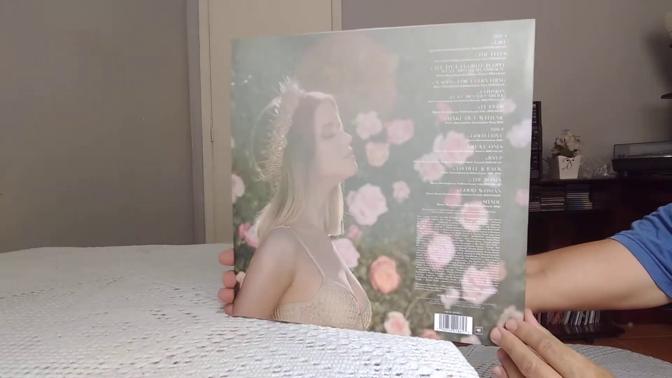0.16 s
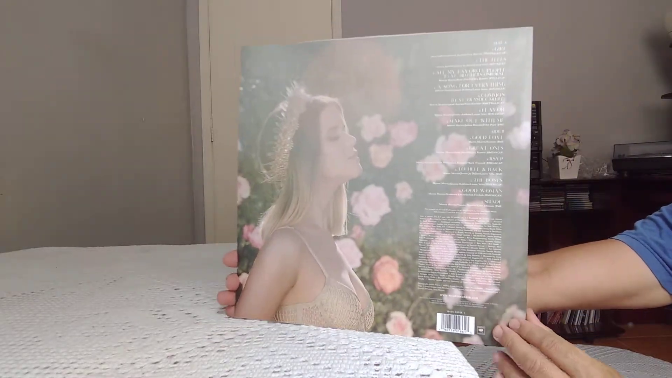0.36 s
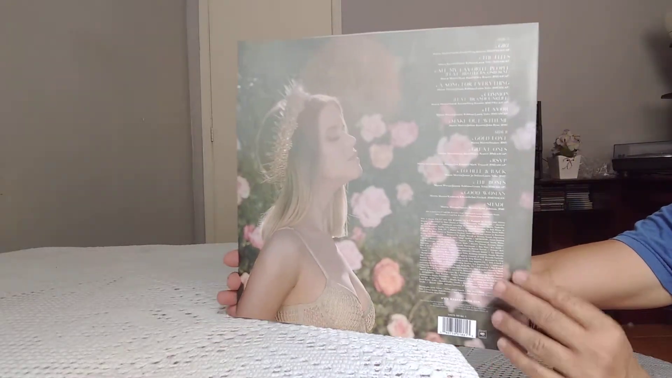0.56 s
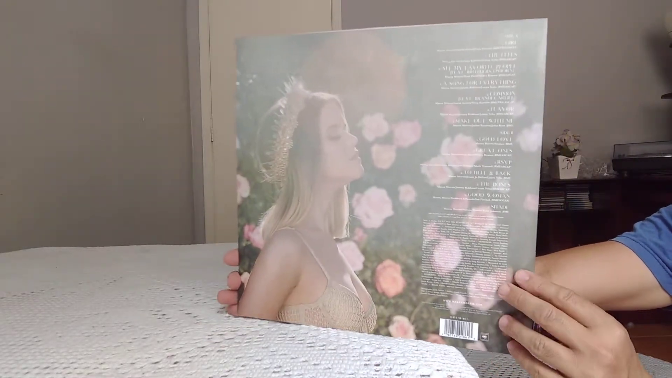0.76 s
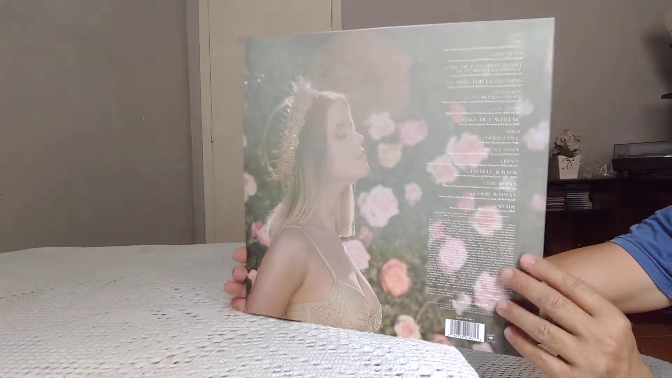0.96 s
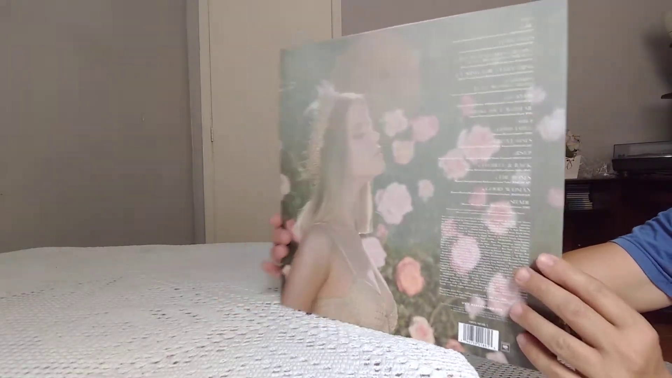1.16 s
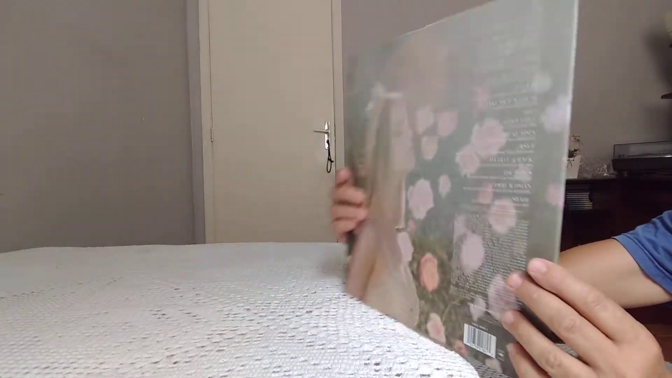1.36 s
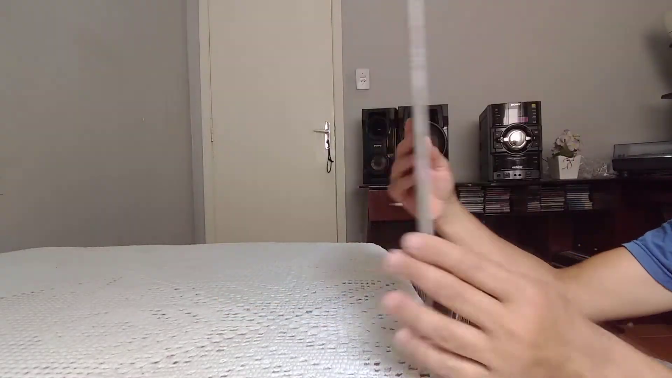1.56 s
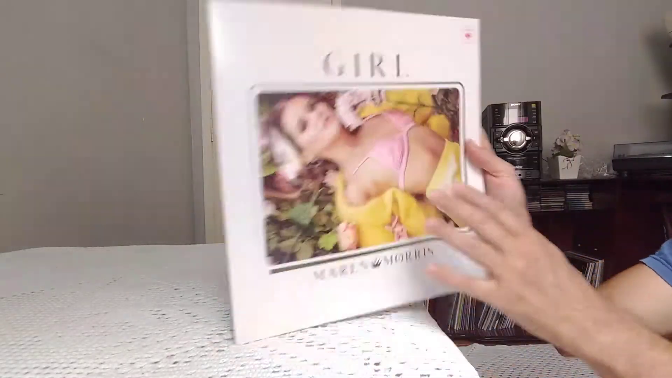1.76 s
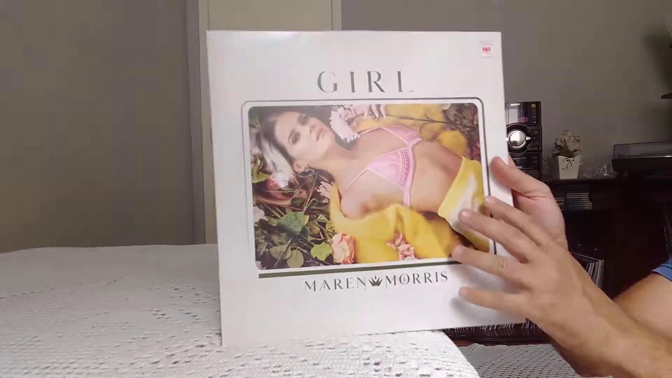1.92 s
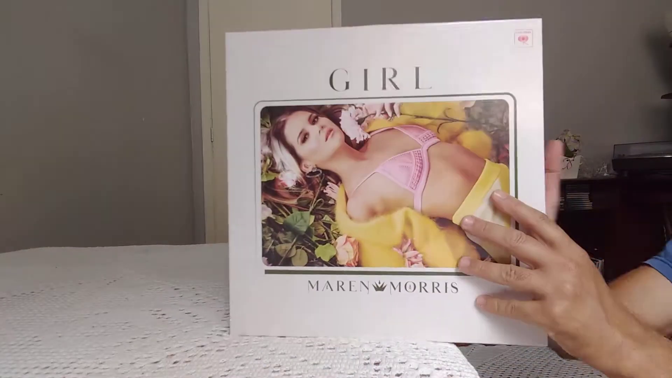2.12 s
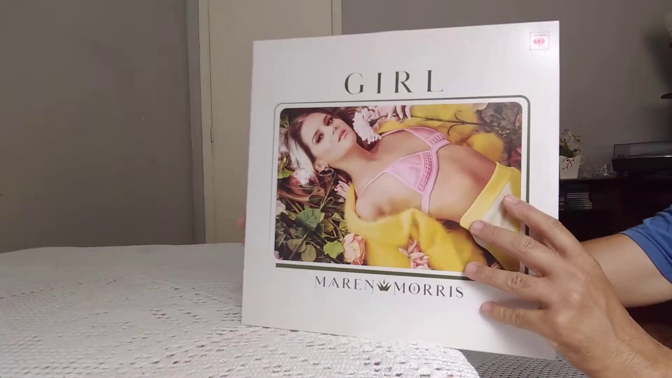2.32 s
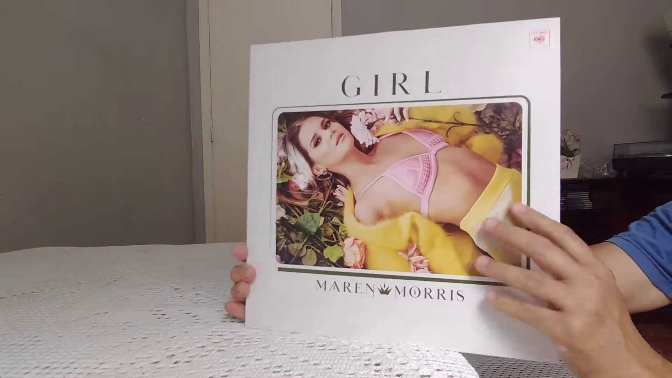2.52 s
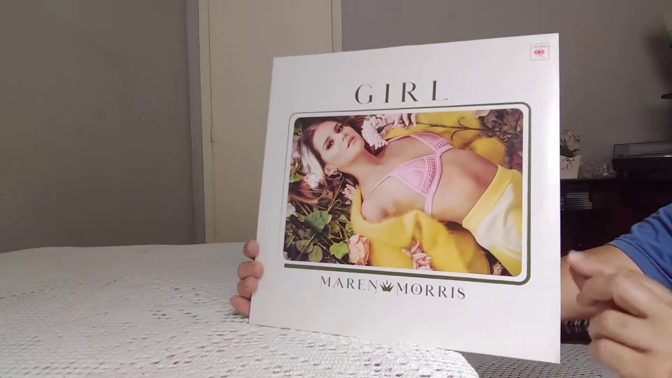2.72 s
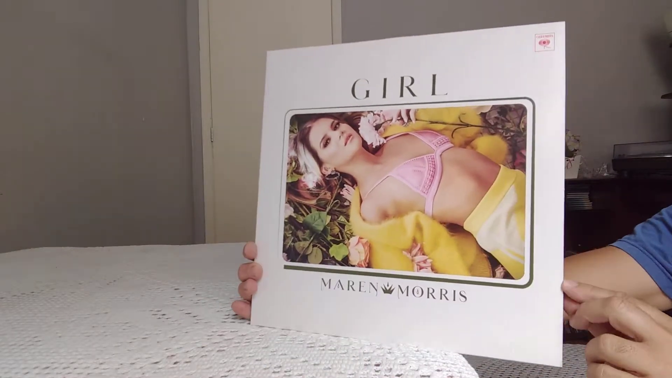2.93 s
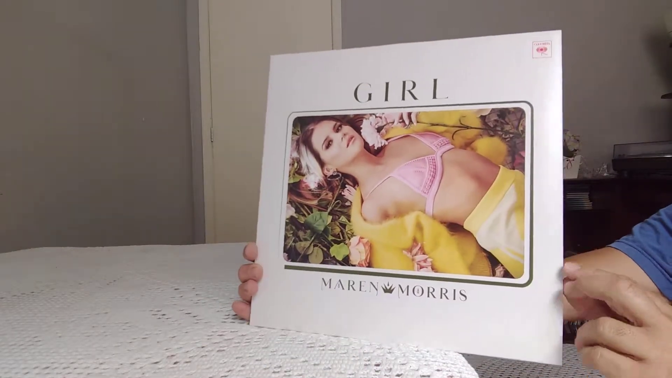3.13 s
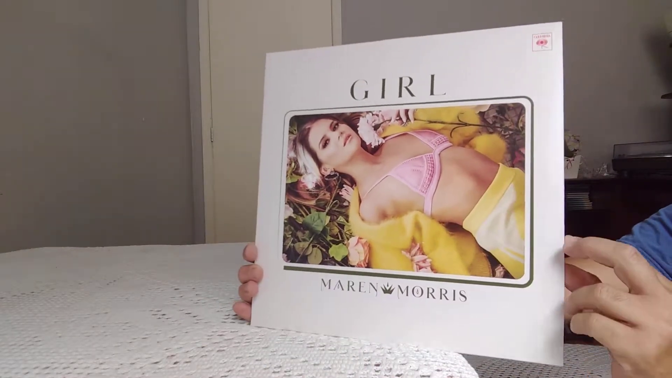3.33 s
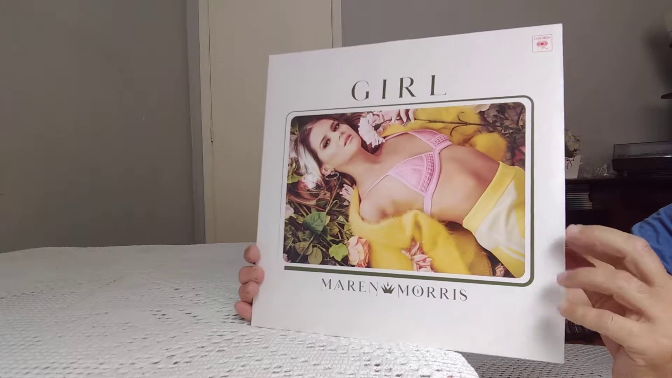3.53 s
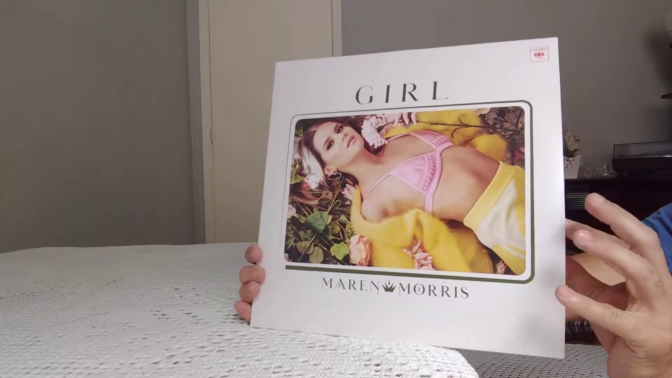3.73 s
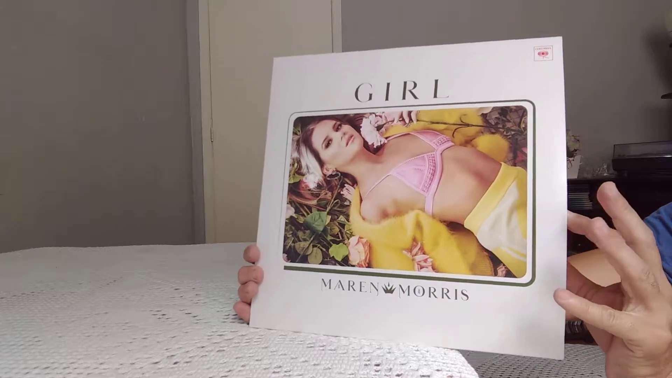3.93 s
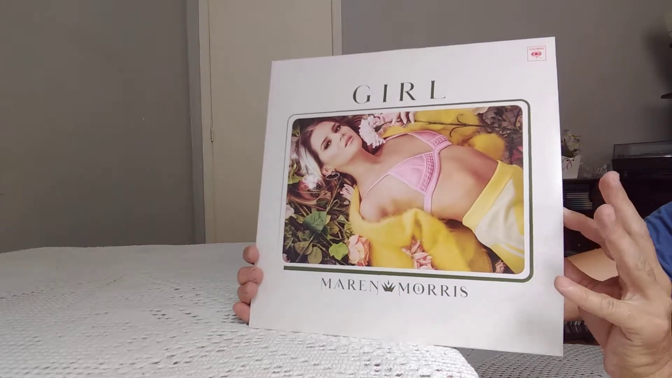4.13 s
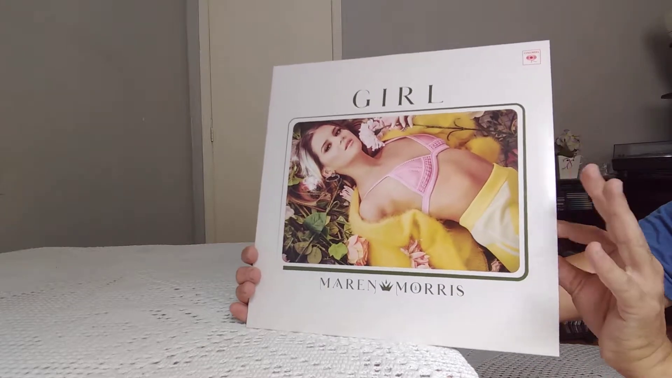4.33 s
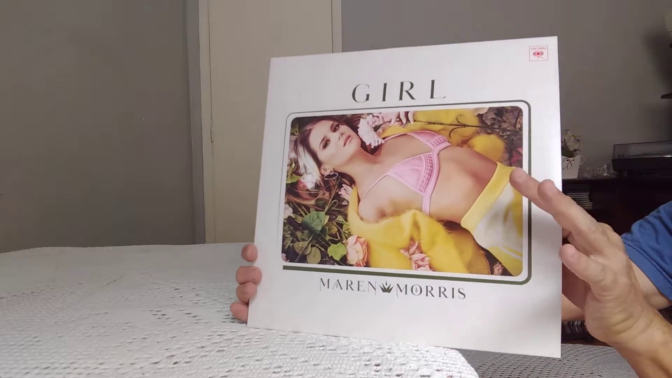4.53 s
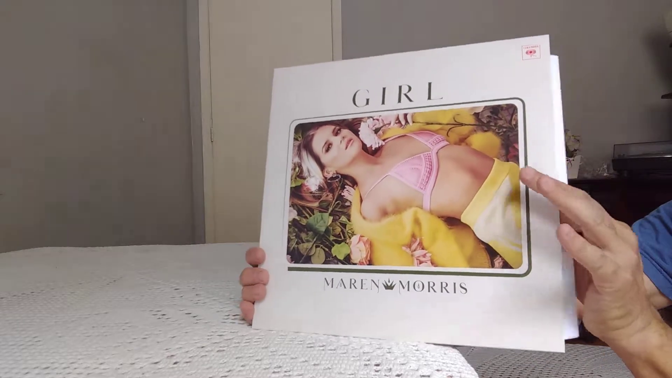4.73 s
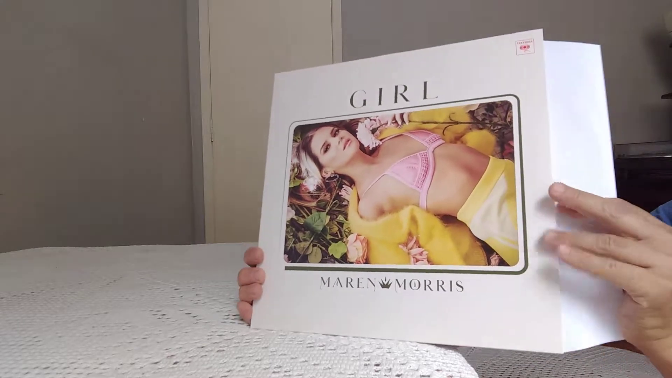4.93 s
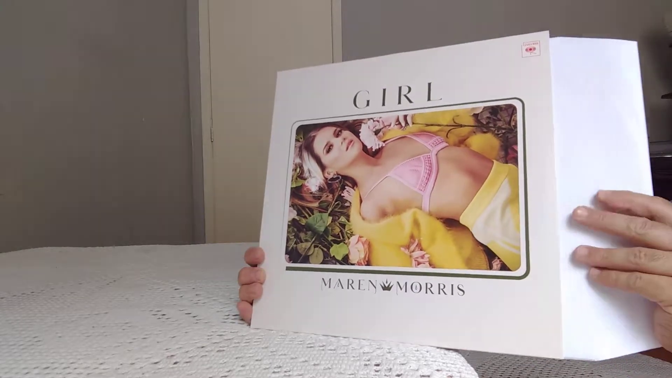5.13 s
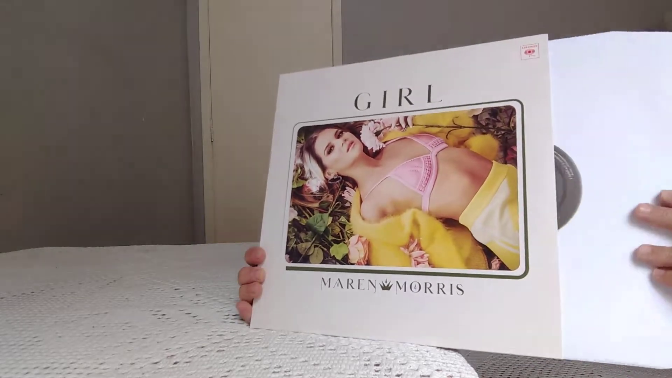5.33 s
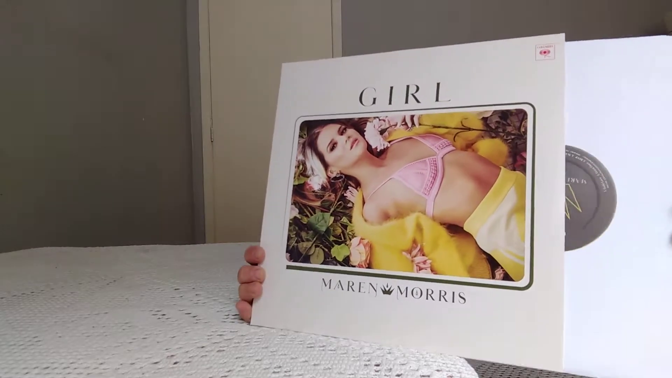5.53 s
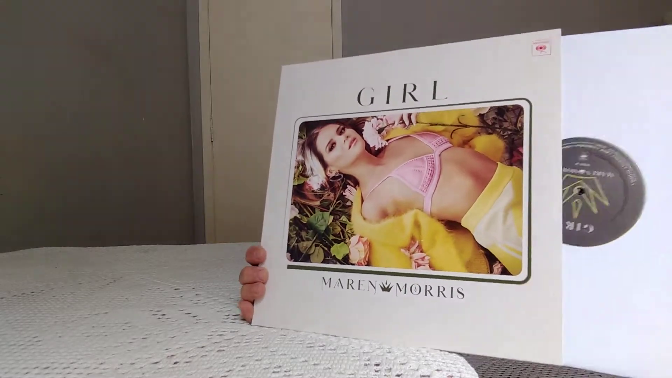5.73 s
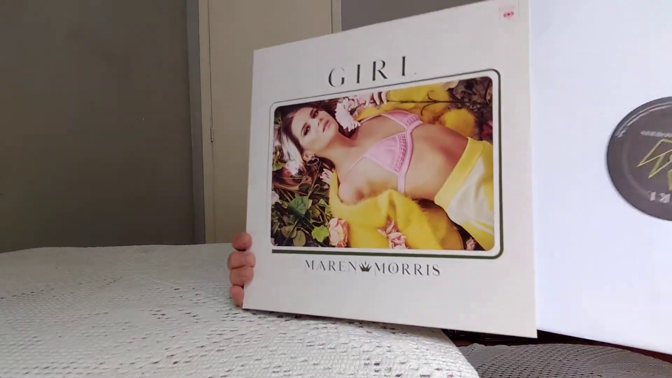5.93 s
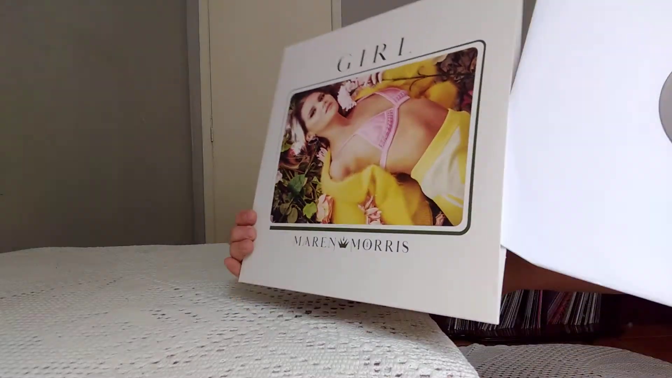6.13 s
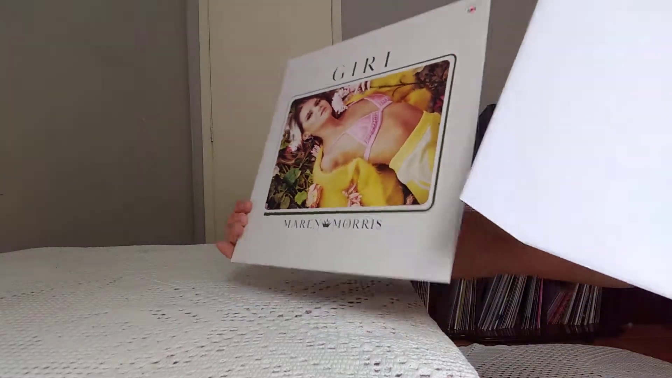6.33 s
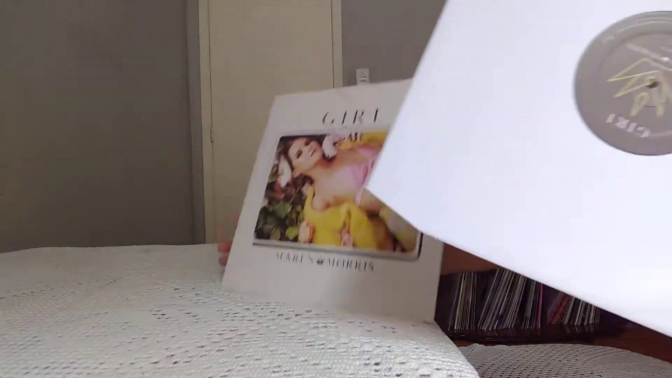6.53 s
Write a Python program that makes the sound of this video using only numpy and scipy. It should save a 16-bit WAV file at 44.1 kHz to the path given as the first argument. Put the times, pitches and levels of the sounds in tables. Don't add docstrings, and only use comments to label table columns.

```python
import sys
import numpy as np
from scipy import signal
from scipy.fft import rfft, irfft, next_fast_len
from scipy.io import wavfile
from scipy.ndimage import uniform_filter1d

SR = 44100
rng = np.random.default_rng(int(sys.argv[2]) if len(sys.argv) > 2 else 0)


def master_out(mix):
    frames = np.transpose(np.atleast_2d(mix))
    ceiling = np.clip(frames, -1, 1)
    pcm = np.round(ceiling * 32767).astype(np.int16)
    wavfile.write(sys.argv[1], SR, pcm)


def boost(x):
    u = np.asarray(x, float) / 20
    return 10 ** u


N = 294049

PORT_DELAY_S, PORT_TURN_RAD = 0.000391, 0.26
REST_HISS_DB = -94


def evened(x):
    return x / np.sqrt(np.mean(x ** 2) + 1e-20)


def peaked(x):
    return x / abs(x).max()


def read(points, hz):
    f, value = np.transpose(points)
    return np.interp(np.log(hz + 1), np.log(f + 1), value)


def glide(s, values):
    return np.interp(np.arange(N) / SR, s, values)


def add(mix, s, sound):
    part = mix[round(s * SR):][:len(sound)]
    part += sound[:len(part)]


def shaped(x, gain):
    size = next_fast_len(N)
    return irfft(rfft(x, size) * gain(np.fft.rfftfreq(size, 1 / SR)), size)[..., :N]


def port_lag(hz):
    return np.exp(-1j * (2 * np.pi * hz * PORT_DELAY_S + PORT_TURN_RAD))


def resonate(x, hz, width):
    turn = np.exp(2j * np.pi * np.cumsum(hz * np.ones(len(x))) / SR)
    r = np.exp(-np.pi * width / SR)
    return 2 * (turn * signal.lfilter([1 - r], [1, -r], x * turn.conj() + 1e-18)).real


def resonate_twice(x, hz, width):
    return resonate(resonate(x, hz, width), hz, width)


def ring(modes):
    t = np.arange(SR // 5) / SR
    return sum(boost(db - 60 * t / t60) * np.sin(2 * np.pi * hz * t) for hz, db, t60 in modes)


def slips(per_s, spread_db, clump_db, clump_s):
    size = boost(spread_db * np.minimum(rng.exponential(1, N), 4)) * (rng.random(N) < per_s / SR)
    clumps = evened(uniform_filter1d(rng.standard_normal(N), max(round(clump_s * SR), 1)))
    return evened(size * rng.standard_normal(N) * boost(clump_db * clumps))


def strokes(s, rise, fall, db, rest_db):
    t = np.arange(0, N + 128, 128)[:, None] / SR
    u = np.where(t < s, (s - t) / rise, (t - s) / fall)
    stroke_db = db - 13 * u ** 1.29
    power = (boost(stroke_db) ** 2).sum(1) + boost(rest_db) ** 2
    return glide(t[:, 0], 10 * np.log10(power))


def air():
    # hz, density_db (per Hz)
    air_tone = [(35, -47), (48, 7.5), (80, -7.5), (130, -2), (220, -7), (400, -10), (800, -14), (1400, -18),
                (2200, -17), (3500, -19), (6000, -22.5), (9000, -29), (14000, -35.5)]
    # hz, likeness (0-1)
    likeness = [(60, 0), (300, 0.52), (600, 0.18), (1200, 0), (2500, 0.16), (4000, 0)]
    # pitch_hz, width_hz, level_db, far_share (signed)
    whines = [
        (54.6, 8.3, -66, 0.32),
        (180.9, 5.3, -70.5, 0.8),
        (1205, 25, -82, 0.86),
        (1840, 35, -70.5, -0.45),
        (142, 6, -74.5, 0.62),
    ]
    count, hz = N // 512 + 5, np.fft.rfftfreq(2048, 1 / SR)
    a, b, c, d, patches = rng.standard_normal((count, 1025, 5)).T
    patches = evened(uniform_filter1d(uniform_filter1d(patches, 16, 0), 8, 1))
    same = read(likeness, hz)[:, None]
    near = a + 1j * b
    far = same * near + np.sqrt(1 - same ** 2) * (c + 1j * d)
    z = np.array([far, near]) * boost(read(air_tone, hz)[:, None] + 1.8 * patches)
    out = boost(-63) * evened(signal.istft(z, nperseg=2048, noverlap=1536)[1][:, :N])
    for pitch_hz, width, db, far_share in whines:
        whine = evened(resonate(rng.standard_normal(N), pitch_hz, width))
        out = out + boost(db) * whine * np.array([[far_share], [1]])
    return out


def table_drone():
    # time_s, pitch_hz, level_db
    load = [(0.0, 56.0, -76), (0.18, 53.4, -65.5), (0.35, 57.56, -74), (1.04, 59.9, -77.5),
            (2.4, 59.9, -72), (2.51, 54.6, -72), (2.69, 54.6, -80), (2.9, 58.8, -71), (4.31, 57.9, -76.5),
            (4.38, 54.4, -86), (4.66, 58.9, -67.5), (4.96, 51.96, -66), (5.22, 51.6, -74),
            (5.4, 59.4, -79.5), (5.7, 60.8, -73), (5.9, 52.6, -66), (6.39, 53.2, -67), (6.67, 49.1, -60)]
    s, *columns = np.transpose(load)
    hz, db = (glide(s, c) for c in columns)
    wander = rng.standard_normal((2, 2, N))
    waver, drift = evened(uniform_filter1d(uniform_filter1d(wander, 1200), 1200))
    phase = 2 * np.pi * np.cumsum(hz) / SR + 0.4 * drift
    return boost(db + 11 + 3.5 * waver) * np.sin(phase) * np.array([[0.51], [1]])


def birds():
    # start_s, length_s, start_hz, end_hz, level_db
    calls = [(0.027, 0.08, 2740, 2760, -65.5), (0.09, 0.1, 5820, 6000, -67.5),
             (0.09, 0.08, 5500, 5700, -71), (0.422, 0.14, 3290, 3250, -69), (0.504, 0.18, 2320, 2530, -67),
             (0.783, .16, 6120, 6000, -74), (0.906, 0.099, 5020, 5040, -69),
             (1.507, 0.066, 6100, 6300, -54), (1.575, .05, 6150, 6100, -61), (1.64, 0.16, 6000, 5840, -72),
             (2.399, .14, 6150, 6320, -68), (2.812, 0.14, 4500, 4040, -71), (2.907, 0.17, 5670, 5860, -71),
             (3.197, 0.2, 6000, 5900, -68.5), (3.744, 0.09, 4730, 4700, -69), (6.21, .08, 7650, 7600, -60),
             (6.237, 0.14, 6880, 6620, -55.5), (6.309, 0.32, 1950, 1900, -74)]
    out = np.zeros((2, N))
    for s, length, from_hz, to_hz, db in calls:
        size = round(length * SR)
        hz, u = np.linspace(from_hz, to_hz, size), np.linspace(0, 1, size)
        swell = np.minimum(u / 0.052, 1) * (1 - u) ** 0.38
        for port in out:
            note = resonate_twice(rng.standard_normal(size), hz, 190)
            add(port, s, boost(db) * evened(note) * swell)
    return out


def surface_hiss(fine):
    # hz, density_db (per Hz)
    hiss_tone = [(1500, -17), (3000, 3), (5000, 6), (7500, 5.5), (10000, 5), (12500, 4.5), (14500, -3.5)]
    return evened(shaped(fine, lambda hz: boost(read(hiss_tone, hz))))


def rasp(coarse, rasp_hz):
    wide = resonate_twice(coarse, 2650, 3200)
    return evened(evened(wide) + 0.7 * evened(resonate(coarse, rasp_hz, 1300)))


def panel_modes(push, modes):
    return evened(sum(boost(db) * resonate_twice(push, hz, 2 * w) / np.sqrt(w) for hz, w, db in modes))


def board(coarse, fine, slot_hz):
    # pitch_hz, width_hz, level_db
    board_modes = [(540, 200, -8.5), (916, 210, -7.5), (1900, 1230, 7.5)]
    slot = evened(resonate(fine, slot_hz, 190))
    return evened(panel_modes(coarse, board_modes) + 0.78 * slot)


def flexing():
    # pitch_hz, width_hz, level_db
    flex_modes = [(143, 83, 3.5), (228, 65, -4), (377, 110, -6)]
    # peak_s, rise_and_fall_s, level_db
    bends = [(.15, 0.17, -61.5), (.45, 0.23, -65.5), (.81, 0.086, -68), (1.2, 0.11, -60.5),
             (1.39, 0.19, -56.5), (1.62, 0.22, -62.5), (1.84, 0.15, -55), (2.03, 0.096, -61.5),
             (2.15, 0.087, -59.5), (2.42, 0.091, -61), (2.6, 0.12, -59), (2.8, 0.16, -60),
             (3.13, 0.08, -74), (3.37, 0.17, -63.5), (3.53, 0.072, -59), (3.79, 0.057, -58.5),
             (4.03, 0.072, -67), (4.5, 0.067, -57), (4.62, 0.088, -61.5), (4.9, 0.62, -60.5),
             (5.25, 0.023, -53.5), (5.7, 0.089, -57.5), (6.0, 0.21, -58.5), (6.14, 0.16, -50.5),
             (6.23, 0.03, -51), (6.31, 0.12, -52.5), (6.61, 0.049, -42)]
    s, length, bend_db = np.transpose(bends)
    flex_db = strokes(s, length, length, bend_db, -74.5)
    return boost(flex_db + 0.5) * panel_modes(slips(900, 1.1, 1.5, 0.037), flex_modes)


def rubbing():
    # peak_s, rise_s, fall_s, speed_db, panel_weight_db
    turning = [(.06, 0.17, 0.13, -76, 13.5), (.19, 0.22, 0.091, -80, 18.5), (.40, 0.048, 0.056, -79.5, 14),
               (.64, 0.2, 0.074, -80.5, 11), (.77, .03, 0.027, -78, -2), (.98, 0.089, .2, -73, -15),
               (1.13, 0.061, 0.087, -62.5, -5), (1.22, 0.061, 0.11, -66, -13), (1.26, .04, .04, -64, -10),
               (1.296, 0.014, 0.06, -58, -14), (1.335, 0.008, 0.02, -58, 3), (1.35, 0.032, 0.065, -52, 4),
               (1.395, .02, .03, -56, -5), (1.44, 0.042, 0.19, -54.5, -1), (1.435, 0.016, .012, -60, 17),
               (1.46, .01, 0.04, -55, -5), (1.53, .08, .08, -72, -17), (1.615, 0.052, 0.053, -56, -12),
               (1.8, 0.65, 0.41, -67, 4), (2.06, 0.16, 0.065, -63, -12), (2.2, 0.13, 0.041, -70, -4),
               (2.47, 0.16, 0.17, -70.5, 6), (2.52, .03, .06, -64, -3), (2.61, 0.091, 0.055, -59.5, 1),
               (2.652, 0.077, 0.019, -59.5, 1), (2.71, .03, 0.072, -76, 4), (2.87, 0.31, 0.25, -79, 11),
               (3.04, 0.051, 0.037, -84, 1), (3.127, 0.0069, 0.0042, -54, 4),
               (3.23, 0.096, 0.13, -78.5, 14), (3.53, 0.17, 0.19, -73.5, 14.5), (3.6, 0.031, 0.03, -72, 5),
               (3.8, .025, 0.034, -76, 21), (3.77, 0.12, 0.085, -72, 10), (3.95, 0.063, 0.037, -72.5, 15.5),
               (4.03, 0.016, 0.018, -80.5, 20)]
    # peak_s, rise_s, fall_s, speed_db, panel_weight_db
    drawing = [(4.268, 0.0049, 0.021, -67, 16.5), (4.25, 0.11, 0.16, -77, 13),
               (4.381, 0.013, 0.063, -66.5, 6.5), (4.47, 0.059, 0.069, -58, 5.5),
               (4.51, 0.054, 0.11, -61.5, 13), (4.685, 0.047, 0.18, -60, 10), (4.79, 0.1, 0.64, -54, -2),
               (4.85, .04, 0.065, -53.5, 6), (4.96, 0.043, 0.046, -61, 7), (5.09, 0.072, 0.046, -58, 8.5),
               (5.04, 0.37, 0.29, -60.5, -3), (5.19, 0.056, 0.18, -56.5, 4), (5.25, 0.023, 0.12, -52, -21),
               (5.39, 0.17, 0.12, -58.5, -1.5), (5.475, 0.08, 0.02, -59.5, 1.5),
               (5.53, 0.05, 0.12, -65.5, 0.5), (5.64, 0.25, 0.03, -68, -9), (5.717, 0.012, 0.01, -48, -10),
               (5.735, .015, .04, -53, -3), (5.765, 0.033, 0.13, -50, -5), (5.79, 0.06, 0.12, -53, -0.5),
               (5.87, 0.11, 0.22, -47, -9), (5.91, .025, 0.03, -50, -4), (5.99, 0.055, 0.046, -50, 0),
               (6.09, 0.038, .02, -49, 2), (6.02, 0.087, 0.16, -57, -11), (6.144, 0.17, 0.032, -43, -1.5),
               (6.23, 0.064, 0.031, -51.5, -10), (6.274, 0.0039, 0.038, -46, -15.5),
               (6.297, 0.02, 0.011, -52, 4.5), (6.34, .03, 0.11, -67.5, 5), (6.44, 0.11, 0.11, -80.5, 16.5),
               (6.554, 0.072, 0.025, -64, -2), (6.592, .006, 0.053, -66.5, 14),
               (6.635, 0.03, 0.18, -71.5, 20)]
    # time_s, grit_db, rasp_hz, slot_hz
    contact = [(0, -3, 4000, 1320), (.2, 7, 4330, 1060), (.6, -22, 3600, 1270), (1.1, 4, 4180, 1490),
               (1.45, 2.5, 4440, 1250), (1.6, -17, 5600, 1290), (1.8, 4.5, 3770, 1320),
               (2.4, 4, 3860, 1450), (2.66, -5, 4170, 1540), (3, 9, 4300, 1400), (3.8, 2, 4100, 1040),
               (4.15, -4.5, 3740, 1070), (4.55, 2.5, 4060, 1100), (5.22, 3.5, 4300, 1540),
               (5.45, -8.5, 4600, 1370), (5.72, -1.5, 4600, 1250), (5.97, -9, 4600, 1530),
               (6.13, 1.5, 3820, 1240)]
    s, rise, fall, speed_db, weight_db = np.transpose(turning + drawing)
    hiss_db = strokes(s, rise, fall, speed_db, REST_HISS_DB)
    board_db = strokes(s, rise, fall, speed_db + weight_db, -74)
    film_db = strokes(*np.transpose(turning)[:4], REST_HISS_DB) - 2
    s, *columns = np.transpose(contact)
    grit_db, rasp_hz, slot_hz = (glide(s, c) for c in columns)
    rasp_db = -64 + 0.63 * (hiss_db + 61) + grit_db
    fine = slips(20000, 1.1, 0.6, 0.0091)
    coarse = slips(7000, 1.44, 1.53, 0.009)
    hiss = surface_hiss(fine)
    sheen = shaped(hiss, lambda hz: 1 / (1 + (11100 / (hz + 1)) ** 4))
    out = boost(hiss_db + 6.5) * hiss + boost(film_db) * sheen
    out += boost(rasp_db + 4) * rasp(coarse, rasp_hz)
    out += boost(board_db - 4) * board(coarse, fine, slot_hz)
    return out + flexing()


def clicks():
    # start_s, peak_db, ring_hz, t60_s
    releases = [(0.644, -47, 1730, 0.0079), (0.994, -52, 794, 0.0055), (1.346, -40, 1450, 0.005),
                (1.374, -41, 1460, 0.0055), (1.393, -41, 864, 0.0055), (1.43, -42, 3400, 0.005),
                (1.435, -35, 1850, 0.0055), (1.439, -37, 2000, 0.0034), (1.458, -44, 1350, 0.0055),
                (1.626, -42, 1700, 0.0055), (2.3554, -44, 3080, 0.003), (2.3695, -42, 3000, 0.0033),
                (2.4227, -32, 1750, 0.0035), (2.4256, -37, 1710, 0.004), (2.44, -49, 1910, 0.0055),
                (2.607, -38, 1490, 0.0036), (2.741, -55, 1184, 0.0055), (2.9575, -43, 1720, 0.0065),
                (2.9695, -50, 1220, 0.0055), (3.5, -39, 1260, 0.0037), (3.522, -42, 1090, 0.0055),
                (3.548, -44, 1200, 0.0051), (3.778, -45, 888, 0.0065), (3.792, -41, 630, 0.0055),
                (3.967, -52, 1340, 0.0055), (4.412, -41, 1340, 0.0061), (4.417, -41, 993, 0.0055),
                (4.425, -40, 1080, 0.0061), (4.433, -47, 1410, 0.0055), (4.501, -36, 1145, 0.0055),
                (4.764, -36, 1280, 0.005), (4.854, -47, 1170, 0.0048), (5.09, -40, 1480, 0.006),
                (5.356, -41, 1420, 0.05), (5.462, -44.5, 1330, 0.05), (5.896, -40, 4500, 0.0055),
                (5.916, -41.5, 3410, 0.0047), (6.083, -40, 1260, 0.0047), (6.09, -36, 1440, 0.0047),
                (6.102, -36, 1400, 0.008), (6.121, -38, 1300, 0.0055), (6.134, -31, 1350, 0.006),
                (6.159, -40, 1400, 0.008), (6.288, -36, 1550, 0.0075), (6.627, -42, 3500, 0.006)]
    out, t = np.zeros(N), np.arange(1500) / SR
    for s, db, hz, t60 in releases:
        fade = boost(-60 * t / t60)
        rise_s = 0.00018 * (t60 / 0.0055) ** 1.5
        onset = 1 - np.exp(-(t / rise_s) ** 2)
        body = fade * np.sin(2 * np.pi * hz * t)
        edge = 0.84 * fade ** 2 * np.sin(2 * np.pi * 3500 * t)
        add(out, s, boost(db + 1) * onset * (body + edge))
    return out


def touch(db, hz, thud_db, treble_db, length):
    u = np.arange(3000) / SR / length
    burst = rng.standard_normal(3000) * u ** 0.69 * np.exp(-u - u ** 2 / 8)
    rung = peaked(resonate_twice(burst, hz, min(400 + 0.77 * hz, 2300)))
    thud = peaked(resonate(resonate(burst, 390, 610), 440, 600))
    crackle = peaked(resonate_twice(burst, 8500, 9000))
    return boost(db) * (rung + boost(thud_db + 7) * thud + boost(treble_db + 10.5) * crackle)


def scuffs():
    # start_s, peak_db, ring_hz, length_s
    scrapes = [
        (1.29, -47, 3000, .009),
        (1.426, -34.5, 2900, 0.0064),
        (1.85, -43, 3200, 0.017),
        (2.357, -54, 3100, 0.002),
        (2.439, -46, 2200, 0.0035),
        (2.736, -49, 2700, 0.0043),
        (2.956, -45, 2660, 0.003),
        (3.515, -47, 6200, 0.006),
        (6.539, -49, 2080, .006),
    ]
    out = np.zeros(N)
    for s, db, hz, length in scrapes:
        add(out, s, touch(db, hz, -33, -19, length))
    return out


def taps():
    # start_s, peak_db, ring_hz, thud_db (re peak)
    fingertips = [(1.336, -45.5, 1230, -6), (1.37, -39.5, 990, -20), (1.465, -43, 1370, -15),
                  (1.629, -45, 1090, -34), (1.866, -54, 620, 0), (1.997, -43.5, 1740, -13),
                  (2.421, -41, 1796, -25), (2.607, -41, 1520, -14), (3.127, -39.5, 1620, -18),
                  (3.493, -41.5, 1340, -35), (3.653, -50, 900, -10), (3.792, -46, 400, -24),
                  (4.006, -46.5, 835, -28), (4.264, -53, 1065, -23)]
    out = np.zeros(N)
    for s, db, hz, thud_db in fingertips:
        add(out, s, touch(db, hz, thud_db, -23, 0.0041))
    return out


def landings():
    # (pitch_hz, level_db, t60_s)
    bumps = [(1.468, -50, [(228, 0, 0.66)]), (1.821, -42.5, [(350, 0, .06), (414, 0, .05)]),
             (4.49, -45, [(184, 0, .15)]), (5.05, -50.5, [(130, 0, .3)]), (6.079, -34, [(304, 3, 0.04),
             (200, -11, 0.055)]), (6.106, -39, [(447, 0, .04)]), (6.131, -36, [(330, 0, .035),
             (266, -3, .05)]), (6.16, -40, [(156, -2, 0.13), (269, -1, .1)]),
             (6.2976, -35.5, [(234, 6, 0.096), (170, -11.5, 0.11)]), (6.5834, -28, [(115, -6, .2),
             (174, 3, 0.16), (260, -1, .15), (388, 10, 0.052), (620, 7, 0.05), (1130, -3, 0.035)]),
             (6.634, -23.5, [(111, -5, .15), (242, 4, 0.13), (280, -3, 0.11), (480, -31, .06)])]
    out = np.zeros(N)
    for s, db, modes in bumps:
        add(out, s, boost(db) * peaked(np.convolve(ring(modes), np.hanning(24))))
    return out


def tugs():
    # start_s, peak_db, ring_hz, thud_db (re peak)
    catches = [(4.423, -51, 1010, -26), (4.487, -39.5, 800, -26), (4.849, -49, 1200, -26),
               (5.369, -52, 1460, -47), (5.469, -49, 1260, -11), (5.714, -47, 1200, -4),
               (6.02, -56, 589, 7.5), (6.079, -46, 800, -1), (6.119, -40.5, 1390, -2),
               (6.134, -39, 1310, -17), (6.278, -40, 1450, -29.5), (6.299, -40, 495, -8.5)]
    out = np.zeros(N)
    for s, db, hz, thud_db in catches:
        add(out, s, touch(db, hz, thud_db, -9.5, 0.0045))
    return out


def paper_snap():
    # pitch_hz, level_db, t60_s
    snap_modes = [(295, -15.5, 0.026), (620, -13.5, 0.0093), (1040, -11.5, 0.0096), (1580, -30, 0.0094),
                  (3180, 0.5, 0.005), (4600, -4, 0.0066), (6000, 15.5, 0.0022), (7230, 4.5, 0.0037),
                  (10060, 3.5, 0.0039), (12800, -2, 0.003), (13900, -4.5, 0.0025)]
    out = np.zeros(N)
    onset = 1 - np.exp(-(np.arange(SR // 5) / 4.5) ** 2)
    add(out, 5.2261, boost(-5) * peaked(ring(snap_modes) * onset))
    return out


def skids():
    # start_s, peak_db, ring_hz, length_s
    corner = [
        (6.584, -31, 1900, 0.0031),
        (6.63, -29, 1740, 0.0022),
        (6.6362, -36, 2400, 0.0016),
    ]
    out = np.zeros(N)
    for s, db, hz, length in corner:
        add(out, s, touch(db, hz, -32, -31, length))
    return out


def room(x, turns_hz=11):
    # hz, t60_s
    decay = [(200, .28), (1000, .2), (4000, .11), (12000, .06)]
    # hz, level_db
    wet_tone = [(300, -12.5), (1500, -7), (5000, -5.5), (12000, -5)]
    size = SR // 3
    echoes = np.zeros((3, 2, size))
    at = np.arange(60, size - 20, 20) + rng.integers(0, 20, (3, 2, (size - 61) // 20))
    np.put_along_axis(echoes, at, rng.choice([-1., 1.], at.shape), 2)
    hz, t, z = signal.stft(echoes, SR, nperseg=128)
    tail = signal.istft(z * boost(-60 * t / read(decay, hz)[:, None]), SR, nperseg=128)[1]
    tail = tail / np.linalg.norm(tail[0, 0])
    phase = turns_hz * np.arange(N) / SR + np.arange(3)[:, None] / 3
    turns = np.sqrt(2 / 3) * np.cos(np.pi * phase)
    wet = signal.oaconvolve((x * turns)[:, None], tail, axes=2)[..., :N].sum(0)
    return shaped(wet, lambda hz: boost(read(wet_tone, hz)))


def far_port(hands, rub):
    # hz, level_db
    shadow = [(300, -3), (1000, -8), (2200, -8.5), (5000, -33), (12000, -22)]
    # time_s, share
    aside = [(0, 0.02), (4.4, .05), (4.8, .25), (6.2, 0.18), (6.45, .05)]
    far = shaped(hands, lambda hz: boost(read(shadow, hz)) * np.exp(-2j * np.pi * hz * 0.00003))
    bent = glide(*np.transpose(aside)) * rub
    return far + shaped(bent, lambda hz: port_lag(hz) / (1 + (6600 / (hz + 1)) ** 6))


def back_face(both):
    # time_s, low_share, high_share
    backface = [(0, 0, .2), (1.1, 0.065, 0.44), (1.45, 0.045, 0.47), (1.52, 0.66, 0.64), (1.6, 0.74, 0.44),
                (1.8, 0.78, 0.36), (1.9, .1, .65), (2.3, 0.32, 0.26), (4.6, 0.032, .2), (5.25, 0.0078, .3),
                (5.3, .5, .3), (5.6, .8, .3), (5.86, 0.46, 0.4), (5.9, 0.12, 0.97), (6.0, .5, 1),
                (6.1, 0.72, 0.64), (6.3, 0.66, 0.35), (6.55, .4, .2)]
    path_hz = [2420, 4890]
    path_width = [160, 240]
    s, *shares = np.transpose(backface)
    out = np.zeros(N)
    for share, centre_hz, width in zip(shares, path_hz, path_width):
        out -= shaped(glide(s, share) * both, lambda hz: np.exp(-((hz - centre_hz) / width) ** 2))
    return out


def scene():
    rub = rubbing()
    ticked = clicks() + scuffs() + taps() + tugs() + skids()
    blown = landings() + paper_snap()
    hands = rub + ticked + blown
    far = far_port(hands, rub)
    wet = room(rub + boost(-8.5) * ticked + boost(-13) * blown)
    far += back_face(far + hands + wet.sum(0))
    return np.array([far, hands]) + wet + birds() + air() + table_drone()


def roll_off(x):
    return signal.sosfilt(signal.butter(12, 15600, fs=SR, output="sos"), x)


def record(dry):
    # hz, share subtracted
    cross = [(50, 0.7), (400, 1), (1200, 0.58), (2400, 0.59), (5000, 0.16), (6300, 0.34), (9000, 0.18),
             (12000, 0.36), (15000, 0.18)]
    # hz, level_db
    band_edges = [(28, -28), (46, 0), (14250, 0), (14420, -40), (15300, -46), (16000, -70)]
    late = shaped(dry[::-1], lambda hz: read(cross, hz) * port_lag(hz))
    mix = shaped(dry - late, lambda hz: boost(read(band_edges, hz)))
    return roll_off(mix)


dry = scene()
out = record(dry)
master_out(out)
```